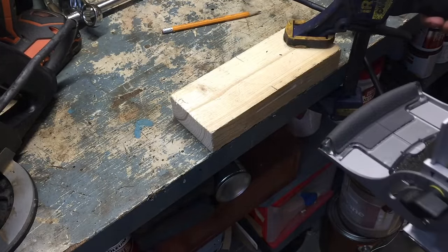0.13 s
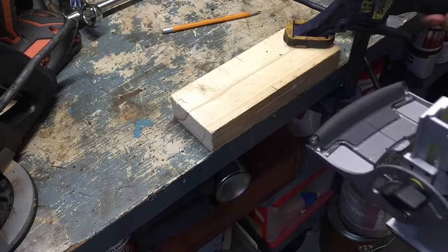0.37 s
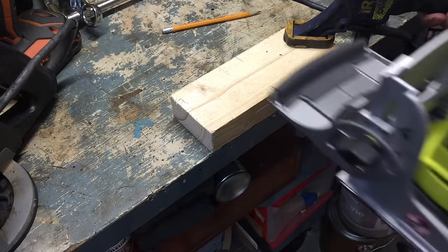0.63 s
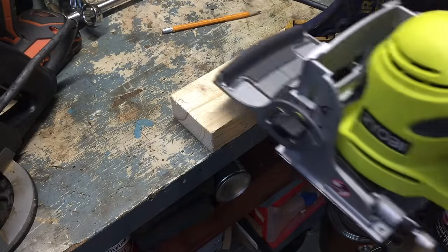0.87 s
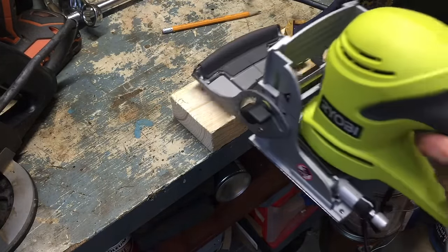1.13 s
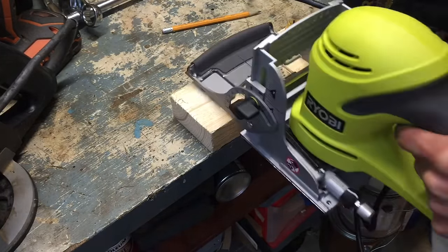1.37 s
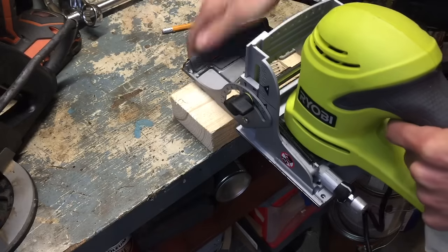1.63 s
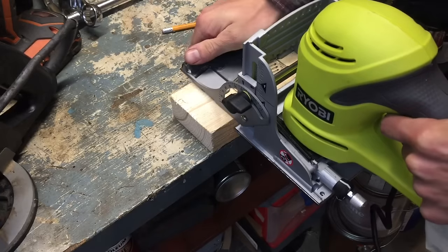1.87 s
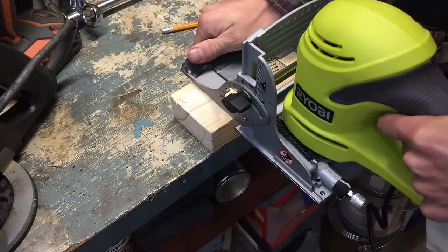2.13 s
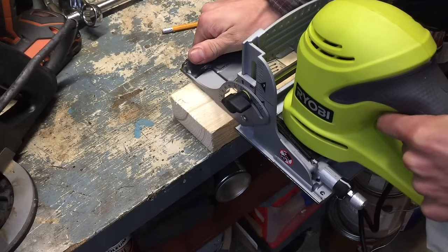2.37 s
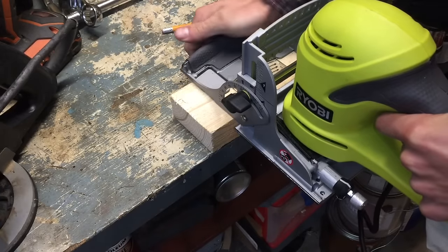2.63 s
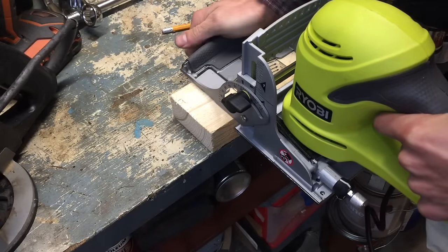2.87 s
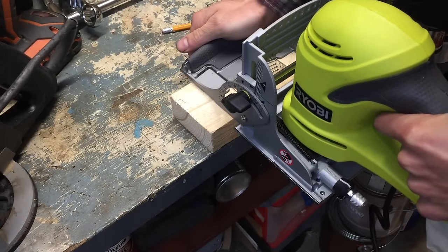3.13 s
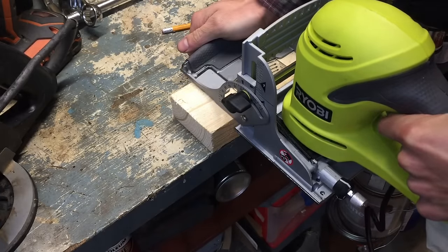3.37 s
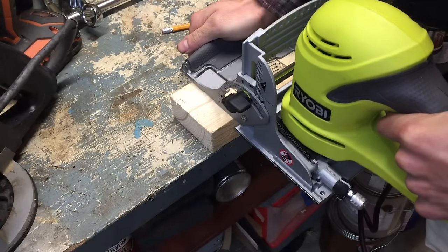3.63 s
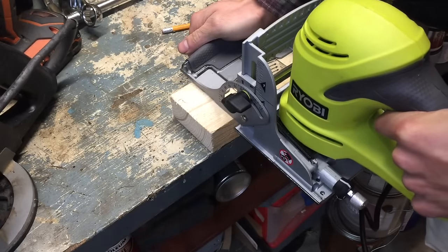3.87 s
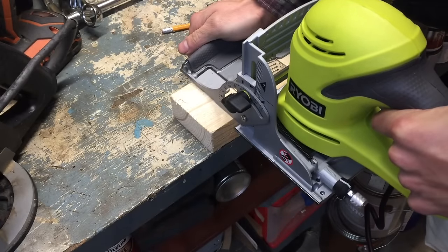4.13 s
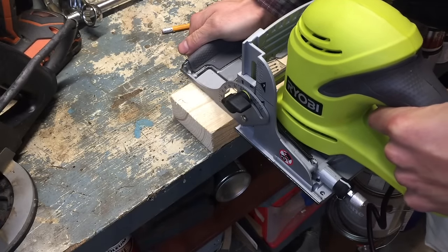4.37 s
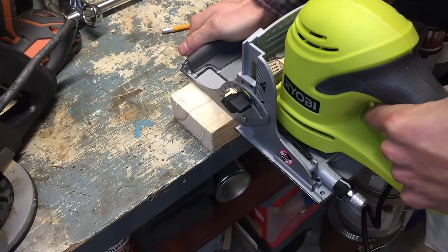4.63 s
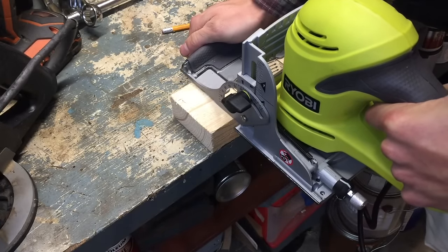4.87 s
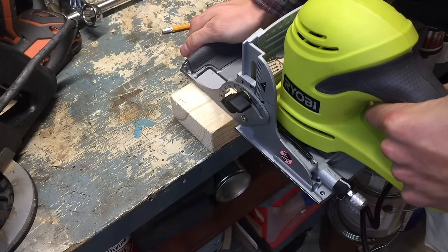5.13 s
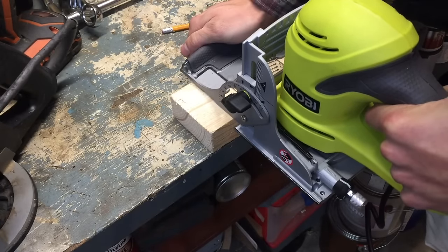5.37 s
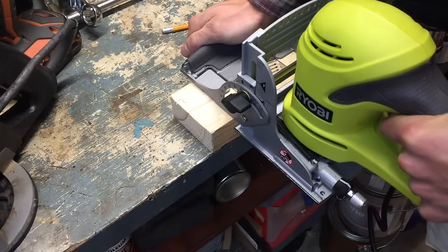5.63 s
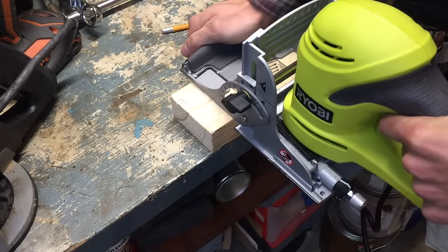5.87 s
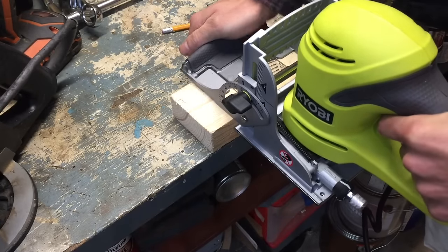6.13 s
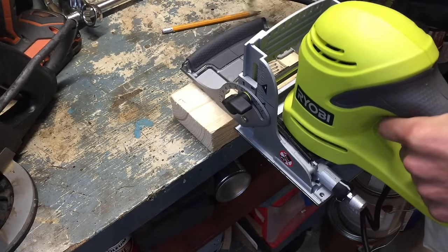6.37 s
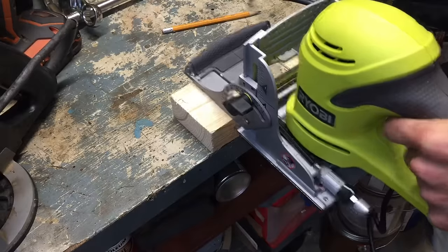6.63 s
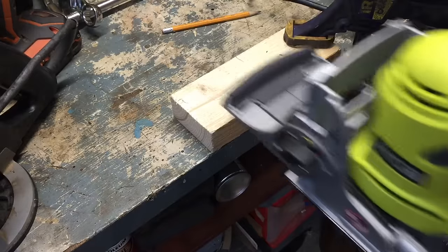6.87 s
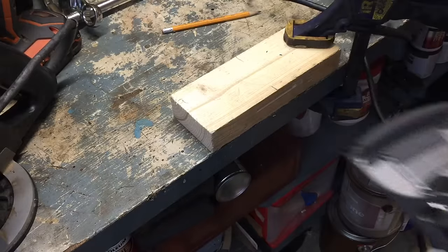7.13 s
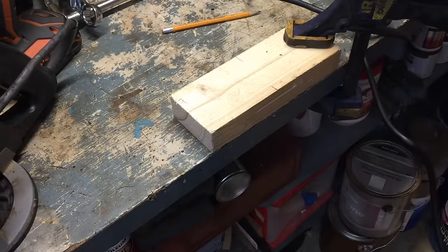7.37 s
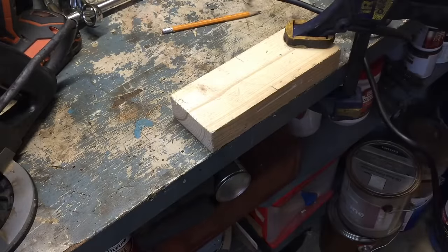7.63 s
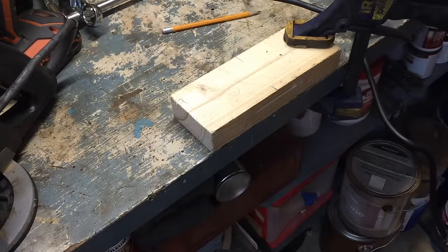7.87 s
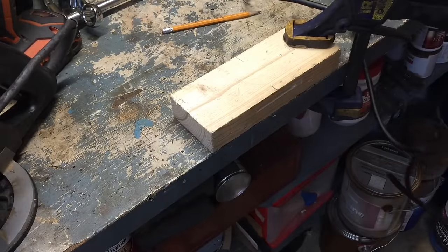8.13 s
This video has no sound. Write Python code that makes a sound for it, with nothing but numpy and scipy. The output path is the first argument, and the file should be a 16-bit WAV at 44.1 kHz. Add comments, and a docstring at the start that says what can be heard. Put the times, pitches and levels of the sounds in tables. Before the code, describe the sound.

A quiet workshop with faint low distant noise and a short echo, heard from close up. From 0 to 1 s, tiny plastic ticks and barely audible squeaks as the tool is carried. At 1.2 s it touches the board with a crisp knock and scuff; more knocks follow, the strongest a duller double thump near 1.54 s with low bench resonance. A soft gritty slide runs from 1.75 to 2 s. Near-quiet follows, with a faint scuff and light tap around 2.7-2.8 s. At 3.46 s a small trigger click, then a hard snap at 3.48 s; the motor bursts in very loud, rough and throbbing, its pitch racing upward before easing toward a steady, bright, gritty whine with rushing air and gear rattle by about 4.7 s. Power ends at 5.86 s; whines glide downward, rattling more slowly, with a low groan before stopping near 7.6 s. A very faint tap comes at 8 s.

```python
"""A quiet workshop with a short echo, the microphone close to a corded biscuit joiner; distant noise throughout.
First small parts tick and squeak; then the tool knocks, scuffs and slides on board and bench: decaying bursts,
bench modes and filtered grit. The trigger clicks, the switch snaps and the motor spins up: gritty gear impacts,
filtered noise and sines locked to the shaft. Power ends and the tool coasts to rest with falling whines."""
import sys
import numpy as np
from scipy import signal
from scipy.io import wavfile
from scipy.ndimage import uniform_filter1d

SR = 44100
rng = np.random.default_rng(int(sys.argv[2]) if len(sys.argv) > 2 else 0)


def volts(x):
    """Linear amplitude factor 10**(x/20) for a level x in dB, scalar or array-like."""
    e = np.asarray(x, float) / 20
    return 10 ** e


def bounce(signal):
    """Save signal as a 16-bit WAV file at the path given by the first command-line argument."""
    frames = np.transpose(np.atleast_2d(signal))
    limited = np.clip(frames, -1, 1)
    pcm = np.round(limited * 32767).astype(np.int16)
    wavfile.write(sys.argv[1], SR, pcm)


N = 363780

# distant workshop noise, shape only: f/Hz, density/dB
SHOP = [(15, -45), (25, -24), (64, -4), (123, -17), (157, -4), (326, -8.5), (394, -4), (476, -12),
        (695, -6.5), (775, -10), (1890, -14.5), (4870, -26), (16000, -36.5)]
SHOP_DB = -62  # middle of its slow swell
# small parts tick as the tool is carried: t/s, peak level/dB, f/Hz
TICKS = [(.095, -43, 2486), (.372, -48, 1848), (.398, -43, 2560), (.953, -42, 2458), (1.563, -46.5, 3030)]
TICK_T60_S, TICK_THUD_DB = 0.03825, -57
# tool touches board or bench: t/s, snap peak level/dB, bench thud peak level/dB, snap f/Hz, snap t60/s
CONTACTS = [(1.207, -36.5, -56.5, 2679, 0.03986), (1.239, -22, -43.5, 2000, .05),
            (1.307, -38.5, -35.5, 1698, 0.02506), (1.402, -46.5, -33, 910.5, 0.0582),
            (1.532, -23, -33, 792.2, 0.0562), (1.545, -32.5, -22.5, 1022, 0.0733),
            (1.594, -36, -29, 2807, 0.01497), (1.747, -40.5, -38, 1241, 0.0401),
            (1.847, -48, -37, 490, 0.0308), (2.803, -41, -43.5, 1099, 0.0803),
            (8.004, -53, -49.5, 395.6, 0.03986)]
# trigger taken up, then contacts close: t/s, peak level/dB, f/Hz
SWITCH = [(3.456, -27, 3673), (3.478, -9.5, 7250)]
SWITCH_T60_S, SWITCH_THUD_DB = 0.025, -45
# higher snaps carry more broad crack: none at DULL_HZ, at most CRACK_SHARE
DULL_HZ, CRACK_PER_KHZ, CRACK_SHARE = 749.7, 0.15047, .4
# modes of the bench: f/Hz, relative level/dB, t60/s
BENCH = [(60, -15.5, 0.12), (103.1, -6, 0.25), (146.78, 7, 0.15), (296.98, 0.5, 0.12), (360, -8.5, 0.11),
         (613.41, -3.5, 0.076), (767.4, -11.5, 0.027)]
# decay of the workshop echo: f/Hz, t60/s
ECHO = [(200, 0.23), (1000, 0.48), (4000, 0.39), (12000, 0.19)]
# rubbing on wood, shape only: f/Hz, density/dB
SLIDE = [(120, -42.5), (200, -16.5), (407, -6), (875, -6), (2240, -4), (14000, -35.5)]
# its raised peaks: f/Hz, width/Hz, added level/dB
SLIDE_PEAKS = [(2150, 700, 6), (4600, 280, 0), (5599.5, 392, 4.5)]
# faint fuzzy squeaks as the tool is handled: t/s, length/s, f/Hz, width/Hz, level/dB
SQUEAKS = [(.3, 0.6263, 1807, 200.2, -67), (0.62, 0.142, 1810, 100, -69.5), (0.349, 0.0629, 3800, 385, -63),
           (0.475, 0.07226, 324.9, 80, -58), (.55, 0.3463, 5403, 400, -74), (2.707, 0.1767, 6695, 400, -71)]
# fence scuffs the wood: t/s, peak level/dB, rise over 30 dB/s, fall over 30 dB/s
SCUFFS = [(1.238, -35, 0.00912, 0.0854), (1.54, -45.5, 0.00296, 0.004), (1.59, -58, 0.0511, 0.0037),
          (2.662, -67.5, 0.0477, 0.37)]
# fence slides into place: t/s, level/dB
SLIDE_LEVEL = [(1.74, -72.5), (1.744, -55), (1.888, -43), (1.958, -50), (2.02, -71.5)]

POWER_ON, POWER_OFF = 3.478, 5.86  # s
TORQUE_HZ, TORQUE_TURNS = 120.08, .03  # twice the mains rate; phase in turns
PINION, WHEEL = 14, 32  # teeth
# shaft speed while powered: t/s, speed/(turns per s)
SPIN_UP = [(3.478, 0), (3.5, 55), (3.55, 128), (3.6, 174), (3.7, 228), (3.77, 262), (3.85, 282),
           (3.95, 297.5), (4.1, 311.5), (4.25, 319.8), (4.45, 326), (4.7, 329.5), (5.0, 331.3), (5.86, 333)]
FULL_SPEED = 333  # turns per s
# speed lost in coasting, to friction and to air: final loss/(turns per s), time constant/s
FRICTION = (630, 2.4)
AIR_DRAG = (8, .16)
# shared level of the six noise layers below: t/s, added level/dB
LEVEL = [(3.48, 1), (3.49, -3.5), (3.56, 1.5), (3.75, 1.5), (4.15, 2.5), (4.6, 1), (5.06, -0.5),
         (5.8, 0.0033), (6.2, 0.0854), (6.55, -1.5), (6.9, .3), (7.1, -.6), (7.3, -1.5), (7.44, -3),
         (7.51, -9), (7.57, -18), (7.64, -31), (7.72, -46)]
# one law per layer: running level/dB, added at full strain/dB, coasting level/dB,
# lost as each turn lasts one full-speed turn longer/dB, most lost/dB
RATTLE_LAW = (-19.5, -3, -21, .7, 9.)
FAN_LAW = (-19.5, -22.5, -17.5, 24.5, 19.)
RING_LAW = (-25.5, -6, -27, 2.2, 40.)
AIR_LAW = (-18, -1.5, -23.5, 2.1, 40.5)
RUMBLE_LAW = (-27.5, -5, -29.5, 7.5, 20.5)
SHELL_LAW = (-28.5, 10.5, -31, 7., 2.)
# tool housing, shape only: f/Hz, density/dB
HOUSING = [(120, -67.5), (200, -43.5), (654, -16.5), (799, -20), (1130, -5.5), (1780, -5.5), (2920, -1),
           (5320, -10.5), (7120, -23.5), (9030, -17), (15600, -58.5)]
# its resonances: f/Hz, width/Hz, added level/dB
HOUSING_PEAKS = [(1172.5, 40, 8.5), (1396, 66, -3), (2033.5, 72, 8.5), (2560, 70, 3.5), (2915.5, 200, 2),
                 (3321.9, 100, 5), (3800, 230, 7), (4400, 110, 7), (4859.6, 95, 4), (5193.4, 160, 8.5),
                 (6443.8, 500, 6.5)]
# tooth chatter near the mesh rate, its double and triple, ahead of the housing peaks:
# full at t/s, holds until t/s, level/dB, fall/(dB per s), settled level/dB
CHATTER = [(3.6, 3.85, -19, 40, -33), (3.53, 3.68, -14, 220, -60), (3.53, 3.57, -19.5, 170, -60)]
CHATTER_START_DB = -47
# the plastic shell booms lower under strain; coasting, it swells as the tooth rate passes through it
SHELL_HZ, SHELL_SAG_HZ, SHELL_COAST_HZ, SHELL_CATCH_DB, SHELL_CATCH_HZ = 981.52, 170, 1070, 3, 700
# groan as the gears nearly stall: f/Hz, width/Hz, relative level/dB
GROAN = [(400, 90, 0), (700, 110, -2)]
GROAN_DB, GROAN_SPEED, GROAN_SPREAD = -47, 33, 20  # speed and spread in turns per s
# fan noise bands: f/Hz, width/Hz, relative level/dB
FAN = [(1250.8, 183, 5), (1406.7, 240, 7), (1498.6, 93, -9.5)]
# blade resonances: f/Hz, width/Hz, relative level/dB
BLADE = [(8001.7, 23, -8), (8310, 79, -19.5), (8516.6, 360, 12.5), (9053.7, 750, 7.5)]
# blade rings out briefly: t/s, width/s, added level/dB
BLADE_FLARES = [(3.64, .05, 9), (4.15, .4, 3), (5.76, .14, 7)]
# rushing air, shape only: f/Hz, density/dB
AIR = [(180, -49.5), (300, -26), (1070, -10), (1350, -2.5), (2290, -12), (3890, -11.5), (7790, -14),
       (8460, -17.5), (15600, -25)]
# its raised peaks: f/Hz, width/Hz, added level/dB
AIR_PEAKS = [(550, 100, 4), (3720, 250, 4), (3990, 70, 3), (4510, 80, 6), (4770, 100, 5), (6630, 120, 3)]
# low rumble, shape only: f/Hz, density/dB
RUMBLE = [(30, -58.5), (70, -35.5), (110, -17), (200, -12.5), (280, -8), (600, -4.5), (900, -3),
          (1200, -40), (2000, -100)]
# whines of fan blades, gear teeth and commutator bars: multiple of the shaft speed
MULTIPLES = [7, 14, 15, 24, 25, 28, 48, 49, 72, 96, 120, 168]
# one row per multiple, ahead of path and housing: powered level/dB, coasting level/dB
WHINES = [(-32, -39), (-32, -26), (-37, -34), (-31, -30), (-45, -36), (-52, -36), (-46, -30), (-55, -35),
          (-47, -33), (-52, -39), (-52, -43), (-52, -48)]
# how well whines get out of the tool: f/Hz, added level/dB
WHINE_PATH = [(500, -35), (900, -14), (1150, 0), (1800, -2), (3300, 2), (4500, -6), (6000, -4), (7500, -10),
              (9000, -5), (11000, -11), (16000, -11)]
# double commutator whistle stands out while powered: f/Hz, added level/dB
WHISTLE = [(11000, 4), (12400, 22), (13700, 22), (14300, 8), (14950, 25), (15500, 33), (15900, 28)]
# bench takes up the turning of blade and shaft, ahead of pressure and sympathy
BLADE_TURN_DB, SHAFT_TURN_DB = -47.5, -50
# how firmly the tool bears on the bench: t/s, added level/dB
PRESSURE = [(3.6, -12), (4.2, 3), (4.7, -0.5), (4.8, 5.5), (5.5, 4.5), (5.74, -22.5), (5.93, -6),
            (6.66, -5), (6.8, -44.5)]
# bench resonances under the turning: f/Hz, width/Hz, added level/dB
BENCH_SYMPATHY = [(60, 50, -7), (103.6, 14, 9), (145.87, 33, 14.5)]


def evened(x):
    """Scales to rms 1."""
    return x / np.sqrt(np.mean(x ** 2) + 1e-20)


def read(points, hz):
    """Reads a spectrum on a log-frequency axis."""
    f, value = np.transpose(points)
    return np.interp(np.log(hz + 1), np.log(f + 1), value)


def curves(rows):
    """Columns of a table at every sample."""
    s, *columns = np.transpose(rows)
    return [np.interp(np.arange(N) / SR, s, c) for c in columns]


def lift(at, peaks):
    """dB added near each peak, along frequency or time."""
    return sum(up_db / (1 + (2 * (at - centre) / width) ** 2) for centre, width, up_db in peaks)


def colour(points, peaks=()):
    """Causal response of a body: smooth spectrum with raised peaks, minimum phase."""
    hz = abs(np.fft.fftfreq(8192, 1 / SR))
    db = read(points, hz) + lift(hz, peaks)
    log_gain = np.log(volts(np.maximum(db, -100)))
    return np.fft.ifft(np.exp(np.conj(signal.hilbert(log_gain)))).real[:4096]


def through(x, response):
    """Convolves and keeps the length."""
    return signal.oaconvolve(x, response)[:N]


def resonate(x, hz, width):
    """A resonance of gain 1 that can follow a curve: shifts to 0 Hz, smooths, shifts back."""
    turn = np.exp(2j * np.pi * np.cumsum(hz * np.ones(len(x))) / SR)
    r = np.exp(-np.pi * width / SR)
    return 2 * (turn * signal.lfilter([1 - r], [1, -r], x / turn)).real


def bands(x, peaks):
    """Steep resonances side by side, each passed twice; the sum has rms 1."""
    return evened(sum(volts(db) * evened(resonate(resonate(x, hz, w), hz, w)) for hz, w, db in peaks))


def grit(per_s, spread_db, smooth):
    """Impacts of uneven size over smooth noise, with steady power whatever their rate."""
    chance = np.clip(per_s / SR, 1e-3, 1)
    size = volts(spread_db * np.minimum(rng.exponential(1, N), 4)) * rng.standard_normal(N)
    impacts = size * (rng.random(N) < chance) / np.sqrt(chance)
    return evened(impacts) + smooth * rng.standard_normal(N)


def wander(hz):
    """Slow chance of rms 1."""
    low_pass = signal.butter(2, hz, fs=SR, output="sos")
    return evened(signal.sosfilt(low_pass, rng.standard_normal(N)))


def shop():
    """Distant noise, shaped by frequency, that swells slightly."""
    return volts(SHOP_DB + wander(4)) * evened(through(rng.standard_normal(N), colour(SHOP)))


def ring(modes, chance):
    """Dying modes under a soft push, a little different at every blow; peak 1."""
    t = np.arange(SR // 3) / SR
    out = sum(volts(db + 3 * c - 60 * t / t60) * np.sin(2 * np.pi * hz * (1 + c / 35) * t)
              for (hz, db, t60), c in zip(modes, chance))
    out = out * np.minimum(t / 0.0045, 1)
    return out / abs(out).max()


def knocks():
    """Each tick, contact or switch click snaps as a decaying noise burst and thuds in the bench modes."""
    out, t = np.zeros(N + SR), np.arange(SR // 3) / SR
    ticks = [(s, db, TICK_THUD_DB, hz, TICK_T60_S) for s, db, hz in TICKS]
    clicks = [(s, db, SWITCH_THUD_DB, hz, SWITCH_T60_S) for s, db, hz in SWITCH]
    for s, snap_db, bench_db, hz, t60 in ticks + list(CONTACTS) + clicks:
        chance = rng.standard_normal(len(t))
        broad = np.clip((hz - DULL_HZ) / 1000 * CRACK_PER_KHZ, 0, CRACK_SHARE)
        burst = chance * volts(-60 * t / max(t60, .005))
        crack = signal.lfilter([1], [1, -1.1, .35], np.diff(burst, prepend=0))
        snap = (1 - broad) * bands(burst, [(hz, hz / 2, 0)]) + broad * evened(crack)
        thud = ring(BENCH, chance[::-1])
        at = round(s * SR)
        out[at:at + len(t)] += volts(snap_db) * snap / abs(snap).max() + volts(bench_db) * thud
    return out[:N]


def echo(x):
    """Sparse workshop reflections, each band dying at its own speed."""
    taps = np.zeros(SR // 2)
    at = np.arange(300, len(taps) - 20, 20)
    taps[at + rng.integers(0, 20, len(at))] = rng.choice([-1., 1.], len(at))
    hz, t, z = signal.stft(taps, SR, nperseg=256)
    tail = signal.istft(z * volts(-60 * t / read(ECHO, hz)[:, None]), SR, nperseg=256)[1]
    return through(x, tail / np.linalg.norm(tail))


def squeaks(t, rub):
    """Narrow bands of rubbing noise that swell and fade as half sines."""
    return sum(volts(db) * np.sin(np.pi * np.clip((t - s) / length, 0, 1)) * bands(rub, [(hz, width, 0)])
               for s, length, hz, width, db in SQUEAKS)


def scuffs(t, rub):
    """Short rubs of the fence on wood, rising and falling exponentially."""
    return rub * sum(volts(db - 30 * np.maximum((s - t) / rise, (t - s) / fall)) for s, db, rise, fall in SCUFFS)


def slide(t, rub):
    """The fence slides into place: rubbing noise under one level curve."""
    return rub * volts(curves(SLIDE_LEVEL)[0]) * (t > SLIDE_LEVEL[0][0]) * (t < SLIDE_LEVEL[-1][0])


def handling():
    """Squeaks, scuffs and slide share one unsteady, gritty rub coloured by the wood."""
    t = np.arange(N) / SR
    rough = grit(5000., spread_db=4.0, smooth=1.6) * volts(1.2 * wander(40.))
    rub = evened(through(rough, colour(SLIDE, SLIDE_PEAKS)))
    return squeaks(t, rub) + scuffs(t, rub) + slide(t, rub)


def shaft_speed(t):
    """Spin-up curve, then the coast: friction brakes, air drag takes a little more at first."""
    lost = sum(turns * (1 - np.exp(-(t - POWER_OFF) / s)) for turns, s in (FRICTION, AIR_DRAG))
    return np.where(t < POWER_OFF, curves(SPIN_UP)[0], np.maximum(FULL_SPEED - lost, 0))


def layer_db(law, speed, powered, strain):
    """Level of a noise layer: strain acts under power, slowing takes level away in the coast."""
    on_db, strain_db, off_db, loss_db, most_db = law
    slowed = FULL_SPEED / np.maximum(speed, 15) - 1
    coast_db = off_db - np.minimum(loss_db * slowed, most_db)
    return curves(LEVEL)[0] + powered * (on_db + strain_db * strain) + (1 - powered) * coast_db


def gear_rattle(teeth):
    """Tooth impacts heard through the housing."""
    housing = colour(HOUSING, HOUSING_PEAKS)
    return through(evened(teeth), housing / np.linalg.norm(housing))


def tooth_chatter(t, teeth, speed, powered):
    """Under power the teeth chatter in bands that follow the mesh rate and its multiples."""
    out = 0
    for k, (full, hold, db, fall, end_db) in enumerate(CHATTER, 1):
        times = [POWER_ON, full, hold, hold + (db - end_db) / fall]
        level = volts(np.interp(t, times, [CHATTER_START_DB, db, db, end_db]))
        out = out + powered * level * bands(teeth, [(k * PINION * speed, 380., 0)])
    return out


def shell_boom(teeth, speed, powered, strain, db):
    """The teeth excite one shell resonance, which sags under strain."""
    hz = powered * (SHELL_HZ - SHELL_SAG_HZ * strain) + (1 - powered) * SHELL_COAST_HZ
    catch_db = lift(PINION * speed - hz, [(0.00245, SHELL_CATCH_HZ, SHELL_CATCH_DB)])
    return volts(db + (1 - powered) * catch_db) * bands(teeth, [(hz, 140., 0)])


def gear_groan(teeth, speed, powered):
    """Low bands of tooth noise in the coast, loudest at one shaft speed."""
    near_stall = np.exp(-((speed - GROAN_SPEED) / GROAN_SPREAD) ** 2)
    return (1 - powered) * volts(GROAN_DB) * near_stall * bands(teeth, GROAN)


def fan():
    """Noise in the fan's resonant bands."""
    return bands(rng.standard_normal(N), FAN)


def blade_ring(powered, pulse):
    """Unsteady taps, pulsed by motor torque under power, ring the blade's resonances."""
    taps = grit(4000., spread_db=-2.5, smooth=0.93) * np.maximum(1 + powered * pulse, 0)
    return bands(taps * volts(2 * wander(60.)), BLADE)


def air_rush(powered, strain, pulse):
    """Coloured gritty noise that throbs with the torque."""
    rush = through(grit(9000., spread_db=4.2, smooth=0.83), colour(AIR, AIR_PEAKS))
    return evened(rush) * (1 + (0.09 * powered + 0.5 * strain) * pulse)


def rumble():
    """Low coloured noise."""
    return evened(through(rng.standard_normal(N), colour(RUMBLE)))


def shaft_whines(speed, turns, powered):
    """Sines at multiples of the shaft speed, wavering in level and dying as the shaft stops."""
    fading = np.clip(speed / 75, 0, 1) ** 2
    out = 0
    for k, (on_db, off_db) in zip(MULTIPLES, WHINES):
        db = powered * on_db + (1 - powered) * off_db + 2.8 * wander(7) + read(WHINE_PATH, k * speed)
        if k == 48:  # double commutator whistle
            db = db + powered * read(WHISTLE, k * speed)
        tone = np.sin(2 * np.pi * (k * turns + rng.random()))
        out = out + volts(db) * np.sqrt(2) * fading * (k * speed < SR / 2) * tone
    return out


def bench_shake(speed, turns):
    """The bench takes up the turning of blade and shaft, most near its own resonances."""
    out = 0
    for turn_db, ratio in ((BLADE_TURN_DB, PINION / WHEEL), (SHAFT_TURN_DB, 1)):
        db = turn_db + curves(PRESSURE)[0] + lift(ratio * speed, BENCH_SYMPATHY)
        out = out + np.sqrt(2) * volts(db) * np.sin(2 * np.pi * ratio * turns)
    return out


def motor():
    """All running sounds follow one shaft; torque pulses at twice the mains rate."""
    t = np.arange(N) / SR
    speed = shaft_speed(t)
    powered = uniform_filter1d(1. * (t > POWER_ON) * (t < POWER_OFF), 200)
    strain = powered * np.clip(1 - speed / speed.max(), 0, 1)  # current is high until full speed
    pulse = np.cos(2 * np.pi * (TORQUE_HZ * (t - POWER_ON) + TORQUE_TURNS))
    turns = np.cumsum(speed * (1 + .0012 * wander(25.))) / SR
    rattle_db, fan_db, ring_db, air_db, rumble_db, shell_db = (
        layer_db(law, speed, powered, strain)
        for law in (RATTLE_LAW, FAN_LAW, RING_LAW, AIR_LAW, RUMBLE_LAW, SHELL_LAW))
    ring_db = ring_db + lift(t, BLADE_FLARES)
    teeth = grit(3000 + 1.2 * PINION * speed, spread_db=4.5, smooth=.9)
    teeth = teeth * np.maximum(1 + (0.11 * powered + 1.9 * strain) * pulse, 0)
    # the housing lifts chatter and whines at its peaks
    tonal = tooth_chatter(t, teeth, speed, powered) + shaft_whines(speed, turns, powered)
    sound = through(tonal, colour([(20, -3), (20000, -3)], HOUSING_PEAKS))
    sound = sound + volts(rattle_db) * gear_rattle(teeth)
    sound = sound + shell_boom(teeth, speed, powered, strain, shell_db)
    sound = sound + gear_groan(teeth, speed, powered)
    sound = sound + volts(fan_db) * fan()
    sound = sound + volts(ring_db) * blade_ring(powered, pulse)
    sound = sound + volts(air_db) * air_rush(powered, strain, pulse)
    sound = sound + volts(rumble_db) * rumble()
    sound = sound + bench_shake(speed, turns)
    return sound * (t > POWER_ON) * (t < LEVEL[-1][0])


def scene():
    """The tool close by, its echo and the distant shop."""
    near = knocks() + handling() + motor()
    return (near + volts(-14.0) * echo(near) + shop())[None]


def roll_off(x):
    """The treble ends steeply here."""
    return signal.sosfilt(signal.butter(12, 17070, fs=SR, output="sos"), x)


def record(dry):
    """The microphone overloads softly and loses deep bass; a steep low-pass then ends the treble."""
    overloaded = np.tanh(dry)
    thin = signal.sosfilt(signal.butter(2, 45., "high", fs=SR, output="sos"), overloaded)
    low_pass = signal.firwin(801, 15780, window=("kaiser", 8), fs=SR)  # cutoff in Hz
    mix = signal.oaconvolve(thin, low_pass[None], "same")
    return roll_off(mix)


dry = scene()
out = record(dry)
bounce(out)
```